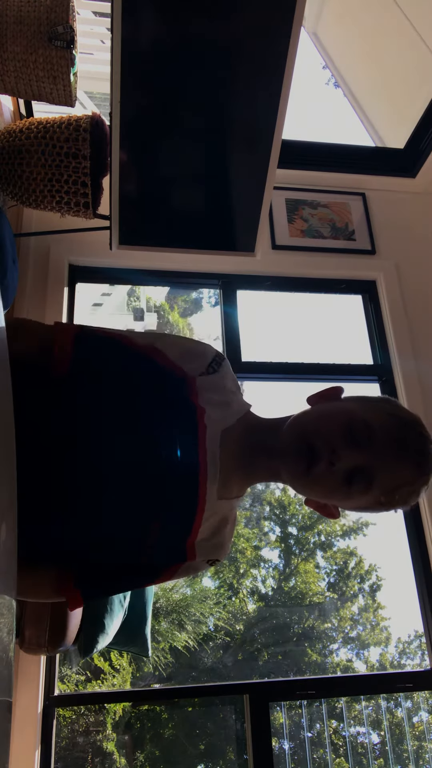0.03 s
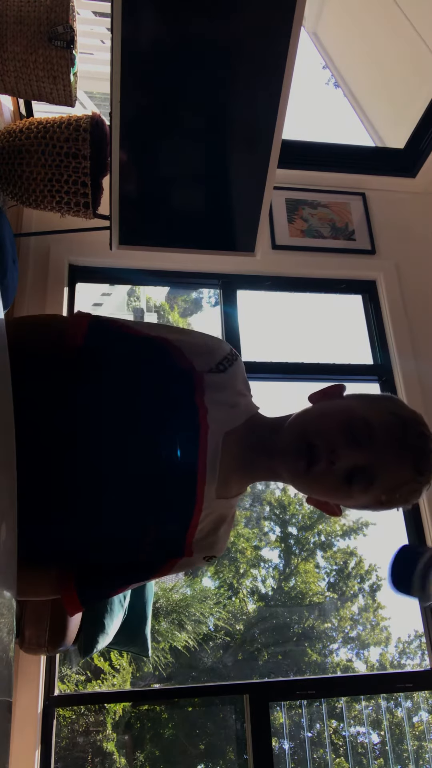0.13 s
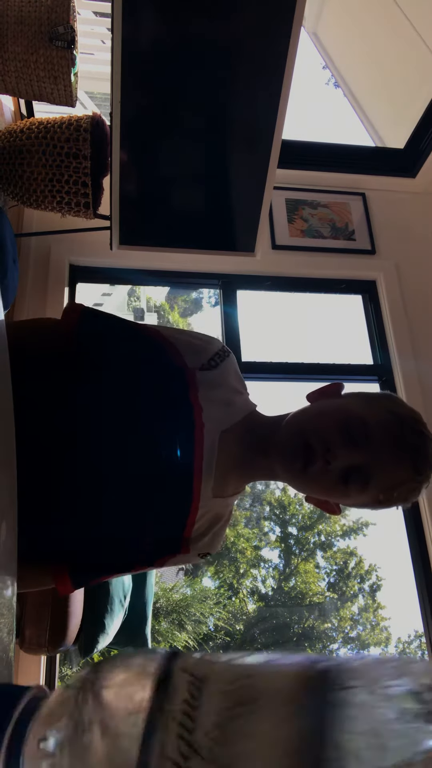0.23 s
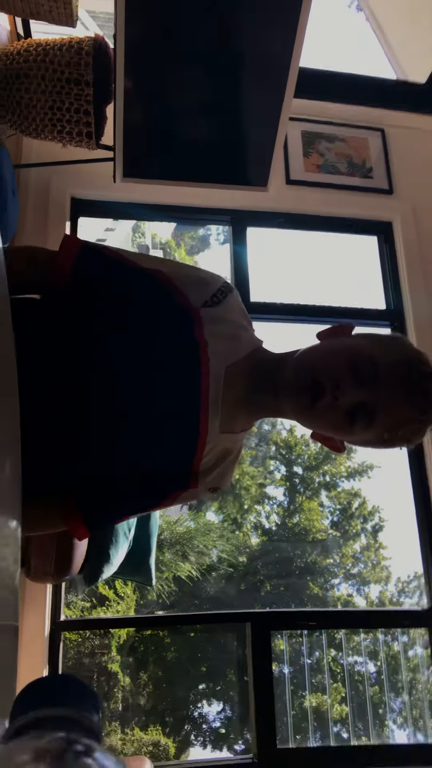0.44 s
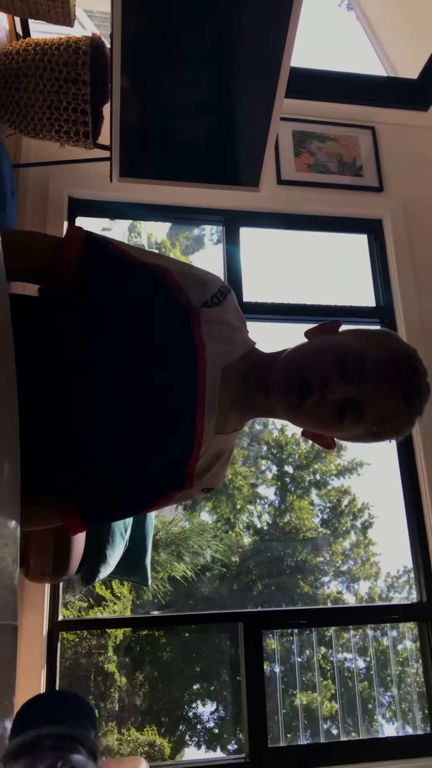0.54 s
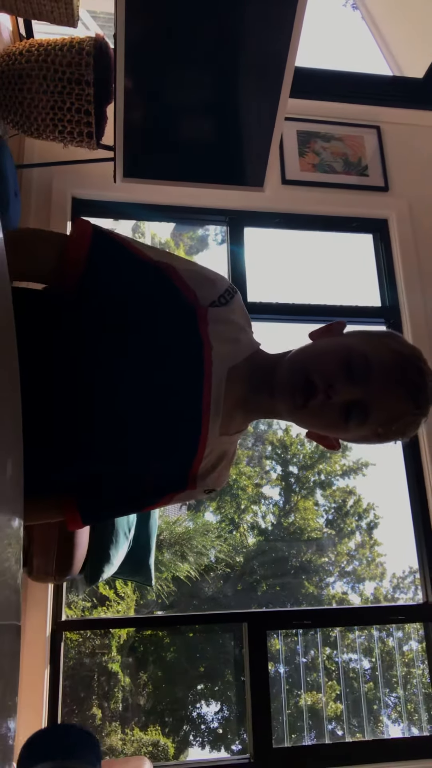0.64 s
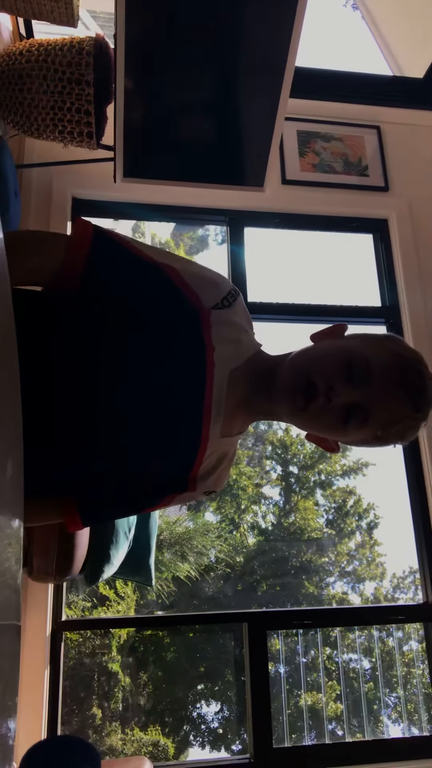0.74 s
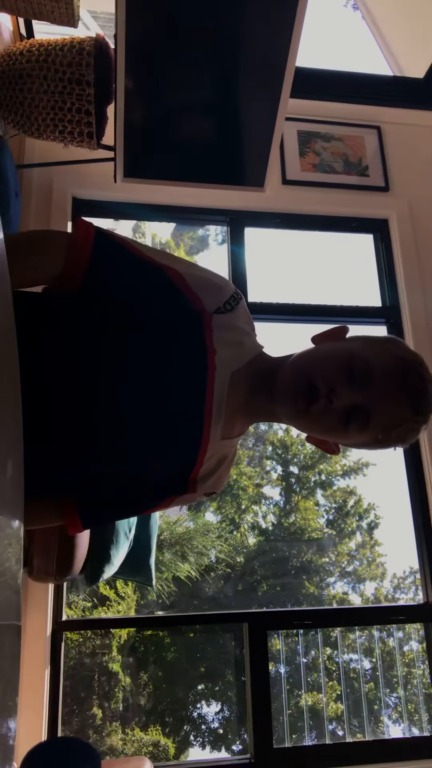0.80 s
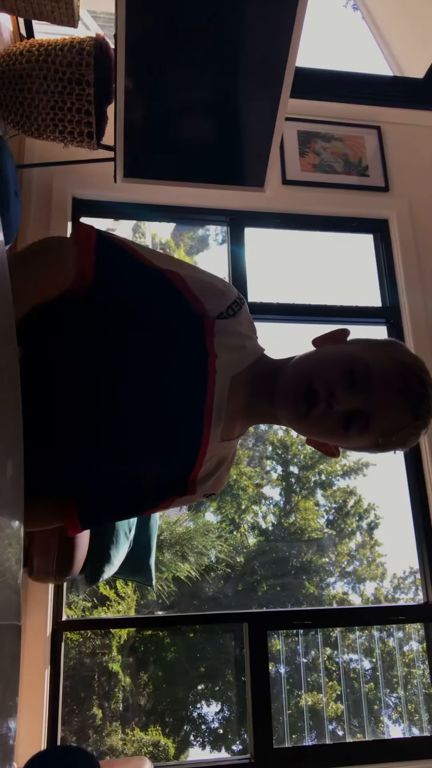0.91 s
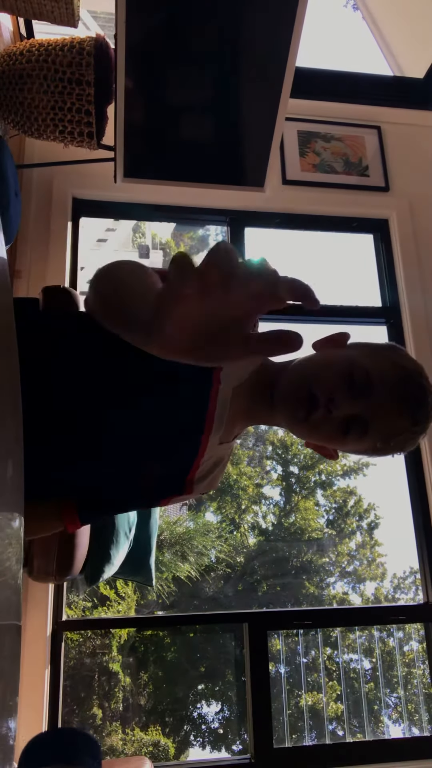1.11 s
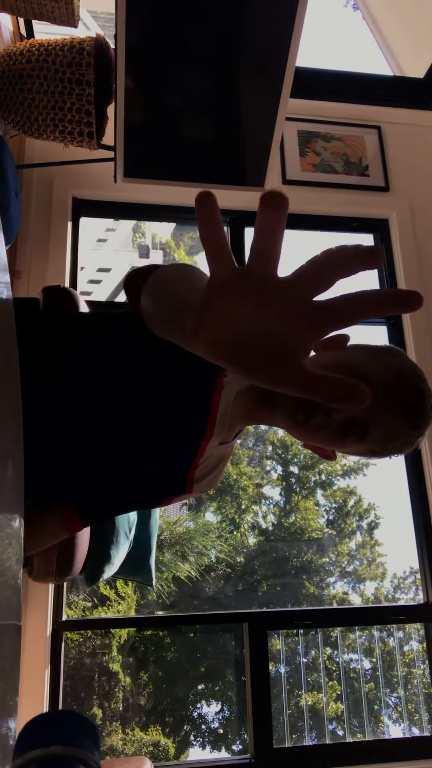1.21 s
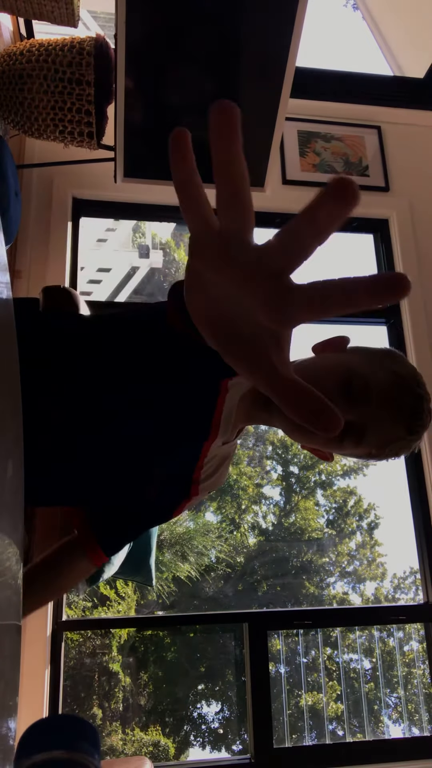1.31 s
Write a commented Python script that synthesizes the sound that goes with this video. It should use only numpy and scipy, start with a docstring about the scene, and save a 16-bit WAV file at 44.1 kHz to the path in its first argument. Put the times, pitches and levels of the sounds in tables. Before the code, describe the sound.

Close to the microphone in a living room, a plastic water bottle hits a tabletop with a sharp, hollow clack as its thin wall snaps. It rocks, knocks a second time, then comes to rest with ticks and a soft bump.

```python
"""A part-filled plastic water bottle lands on a hard table, close to the microphone in a living room.
After a light rustle it hits edge first, then flat, thudding through the table and clacking at the rim.
Its thin wall snaps and buckles, sounding a hollow rising note; it rocks, knocks down again and
settles with small ticks and a soft bump. Behind it the room rings on over a quiet rumble.
One microphone, mono, near enough that the loudest peaks are rounded."""
import sys
import numpy as np
from scipy import signal
from scipy.fft import rfft, irfft, next_fast_len
from scipy.io import wavfile
from scipy.ndimage import uniform_filter1d

SR = 44100
rng = np.random.default_rng(int(sys.argv[2]) if len(sys.argv) > 2 else 0)


def to_wav(s):
    """Save 16-bit WAV."""
    ch = np.atleast_2d(s).T  # columns
    pcm = np.round(np.clip(ch, -1, 1) * 32767)  # PCM
    wavfile.write(sys.argv[1], SR, pcm.astype(np.int16))


N = 59535

# snaps of the thin plastic: start_s, ping_db, end_pitch_hz, length_s, grit_db
WALL_SNAPS = [(0.0088, -32.5, 4880, 0.0013, -52.5), (0.0304, -27.5, 3380, 0.00091, -42),
              (0.0331, -29, 5550, 0.00055, -48), (0.1193, -35, 6180, 0.00045, -62),
              (0.229, -39, 6300, 0.00028, -57.5), (0.2493, -1, 5950, 0.00058, -14.5),
              (0.2694, -27, 6764, 0.00061, -40), (0.2738, -2, 5824, 0.0006, -30),
              (0.2903, -15, 6114, 0.00075, -39), (0.394, -41, 6160, 0.00072, -33),
              (0.4003, -31, 6050, 0.0007, -40), (0.4077, -28, 5440, 0.00073, -47),
              (0.4150, -22.5, 5720, 0.00082, -27), (0.4167, -15.5, 11450, 0.0003, -21),
              (0.5855, -34.5, 3320, 0.00067, -76), (0.5856, -36, 4720, 0.0017, -63),
              (0.669, -44.5, 6640, 0.0014, -80), (1.061, -61, 5960, 0.0022, -90)]
# blows on the table: start_s, thud_db, body_db, clack_db, edge_db, ring_db, body_t60_s
TABLE_KNOCKS = [(0.2277, -38, -38, -45, -91, -67, 0.27), (0.2493, -27.5, -8, -11.5, -32.5, -23, 0.16),
                (0.2559, -48, -17.5, -17, -28, -16.5, 0.11), (0.3836, -54, -40, -33, -42, -56, .03),
                (0.3933, -26.5, -12, -37, -30, -26.5, 0.028), (0.4157, -39, -21, -14.5, -44, -35.5, 0.052),
                (0.4188, -67, -19.5, -28.5, -30, -40.5, 0.13), (0.458, -36, -29.5, -38, -42, -65, 0.05),
                (0.51, -75, -33, -36.5, -54, -50, 0.067), (0.598, -66, -37, -44, -74, -43.5, 0.045),
                (0.9950, -69, -53, -58.5, -84, -57, 0.074), (1.0053, -52, -42, -52, -71.5, -60, 0.063),
                (1.023, -43, -44.5, -55.5, -80.5, -63, 0.095)]
# modes of bottle and tabletop: pitch_hz, level_db, t60_s
BOTTLE_MODES = [(204, -13.5, 0.2), (316, -12, .07), (564.2, -3.5, 0.27), (689, -6.5, 0.11),
                (773, -5.5, 0.1), (944, 3, .07), (1100, -16, 0.11), (1388.4, -11.5, 0.1), (1645, -7, 0.13),
                (2044, -9.5, 0.08), (2597, -8, 0.085), (3066, -12.5, 0.065), (3690, -17, 0.07)]
# buckles of the bottle's wall: start_s, level_db, t60_s
WALL_BUCKLES = [(0.2365, -20.5, 0.21), (0.2498, -1.5, 0.072), (0.273, -3, 0.075), (0.2922, -7.5, .05)]
# glide of the hollow note: time_s, pitch_hz
HOLLOW_GLIDE = [(0.243, 419.8), (0.254, 347), (0.266, 406.3), (0.278, 491), (0.297, 509), (0.311, 616)]
# dull bumps on the table: start_s, level_db, pitch_hz, t60_s
TABLE_BUMPS = [(0.25, -20, 64, 0.096), (0.277, -20, 198, .07), (0.429, -25, 495, 0.084),
               (0.448, -32, 118.3, .11), (0.482, -37, 106.2, 0.068), (0.616, -32, 110.5, 0.072),
               (1.021, -39.5, 66.65, 0.19), (1.114, -54, 355, 0.17)]
# decay of the room's echo: frequency_hz, t60_s
ROOM_DECAY = [(100, 0.99), (400, 0.69), (1200, .92), (3500, .8), (7000, 0.64), (15000, .5)]
# standing waves of the room: pitch_hz, level_db, t60_s
STANDING_WAVES = [(357.3, -71.5, 1), (386, -67.5, 1.1)]
# spectra of the noises: frequency_hz, relative_db
RUSTLE_SPECTRUM = [(50, -9), (120, 0), (200, 5), (300, -3), (500, -3.5), (1500, -6.5), (3500, -15),
                   (6000, -16), (9000, -27), (16000, -34)]  # the bottle in flight
GRIT_SPECTRUM = [(2000, -31.5), (5500, -4), (8200, -0.5), (9500, -3), (11800, -3), (14000, -4.5),
                 (16000, -11), (19000, -30)]  # bright burst in a snap
THUD_SPECTRUM = [(25, -19), (60, 2.5), (125, -7), (200, -18), (800, -79.5)]  # bass of a blow
BODY_SPECTRUM = [(100, -37), (220, -1), (370, -4.5), (600, -1), (950, -5.5), (1400, -15.5), (3000, -40),
                 (9000, -80)]  # its low mids
CLACK_SPECTRUM = [(500, -24), (1300, 1), (1650, -0.5), (2050, -3), (2500, -7.5), (4200, -10.5),
                  (6000, -19.5), (13000, -58.5)]  # the hard rim
EDGE_SPECTRUM = [(2500, -23.5), (5500, 4), (7500, 3.5), (9300, -9.5), (12000, -7), (16000, -7)]  # treble edge of a blow
ECHO_SPECTRUM = [(60, -12.5), (200, -14), (360, 0), (700, -3.5), (1000, -3), (1550, -4.5), (2000, -3.5),
                 (3000, -1.5), (4500, 0), (6500, 0.5), (9300, 6.5), (12000, 2.5), (16000, 0)]  # the room's echo
RUMBLE_SPECTRUM = [(20, -30), (45, -12.5), (66, 2), (100, -13), (150, -9.5), (250, -14.5), (380, -16),
                   (500, -20), (1000, -19), (2500, -32.5), (6000, -37), (9000, -43.5), (15000, -46.5)]  # room tone

BLOW_SAMPLES, ATTACK_S = 8192, 0.0006


def undb(db):
    return 10 ** (np.asarray(db) / 20)


def unit_rms(x):
    return x / np.sqrt(np.mean(x ** 2))


def along(points, hz):
    """Read (frequency_hz, value) points on a log-frequency axis."""
    freqs, values = np.array(points, float).T
    return np.interp(np.log(np.maximum(hz, 1)), np.log(freqs), values)


def colour(x, spectrum):
    """Filter a sound by a spectrum table."""
    size = next_fast_len(len(x), True)
    gain = undb(along(spectrum, np.fft.rfftfreq(size, 1 / SR)))
    return irfft(rfft(x, size) * gain, size)[:len(x)]


def noise(spectrum, size=N):
    return unit_rms(colour(rng.standard_normal(size), spectrum))


def dense_ring(spectrum):
    """Many close modes: coloured noise with its deepest swells evened out."""
    x = noise(spectrum, BLOW_SAMPLES)
    for _ in range(3):
        analytic = signal.hilbert(x)
        x = analytic.real / np.sqrt(np.abs(analytic) + .5)
    return unit_rms(x)


def since(start_s):
    return np.maximum(np.arange(N) / SR - start_s, 0)


def strike(t, attack_s, t60_s):
    """Quick rise, exponential fall."""
    return (1 - np.exp(-t / attack_s)) * np.exp(-np.log(1000) * t / t60_s)


def damped_note(t, hz, db, attack_s, t60_s):
    return undb(db) * np.sin(2 * np.pi * hz * t) * strike(t, attack_s, t60_s)


def add(out, start_s, x):
    """Mix a short sound in at its time."""
    part = out[max(int(start_s * SR), 0):][:len(x)]
    part += x[:len(part)]


def rustle(level_db=-43, grain_db=3, hold_s=0.02, fade_s=0.052):
    """Faint, grainy rustling that dies away after the throw."""
    grain = unit_rms(uniform_filter1d(rng.standard_normal(N), size=90))
    fade = np.exp(-since(hold_s) / fade_s)
    return undb(level_db) * unit_rms(noise(RUSTLE_SPECTRUM) * undb(grain_db * grain)) * fade


def snaps(size=512, sag=0.14):
    """A crease flips: a ping of about a millisecond that sags in pitch, with a burst of bright grit."""
    out, t = np.zeros(N), np.arange(size) / SR
    for start_s, ping_db, hz, length_s, grit_db in WALL_SNAPS:
        progress = t / length_s
        phase = 2 * np.pi * hz * length_s * (progress + sag * (1 - np.exp(-2 * progress)))
        envelope = (2 * progress * np.exp(1 - 2 * progress)) ** 2
        burst = envelope * rng.standard_normal(size)
        flat_burst = irfft(np.exp(1j * np.angle(rfft(burst))))  # equally strong at all frequencies
        grit = unit_rms(colour(flat_burst, GRIT_SPECTRUM) * np.sqrt(envelope))
        grit *= np.sqrt(np.mean(envelope ** 2))
        add(out, start_s, undb(ping_db) * envelope * np.sin(phase) + undb(grit_db) * grit)
    return out


def knocks():
    """Each blow thuds through the table and clacks at the bottle's hard rim."""
    out, t = np.zeros(N), np.arange(BLOW_SAMPLES) / SR
    for start_s, thud_db, body_db, clack_db, edge_db, _, body_t60_s in TABLE_KNOCKS:
        thud = undb(thud_db) * dense_ring(THUD_SPECTRUM) * strike(t, attack_s=0.0027, t60_s=0.092)
        body = undb(body_db) * dense_ring(BODY_SPECTRUM) * strike(t, ATTACK_S, body_t60_s)
        clack = undb(clack_db) * dense_ring(CLACK_SPECTRUM) * strike(t, ATTACK_S, t60_s=0.056)
        edge = undb(edge_db) * noise(EDGE_SPECTRUM, len(t)) * strike(t, ATTACK_S / 2, t60_s=0.022)
        add(out, start_s, thud + body + clack + edge)
    return out


def bottle_ring():
    """Every blow rings the same short-lived modes of bottle and tabletop."""
    out, t = np.zeros(N), np.arange(BLOW_SAMPLES) / SR
    ring = sum((-1) ** k * damped_note(t, hz, db, ATTACK_S, t60_s)
               for k, (hz, db, t60_s) in enumerate(BOTTLE_MODES))
    for start_s, *_, ring_db, _ in TABLE_KNOCKS:
        add(out, start_s, undb(ring_db) * ring)
    return out


def hollow_note(attack_s=0.0011, end_s=0.305, release_s=0.0043):
    """One hollow note, renewed at each buckle, dips, rises as the dented wall springs back, then stops."""
    hz = np.interp(since(0), *np.array(HOLLOW_GLIDE).T)
    swell, t = np.zeros(N), np.arange(BLOW_SAMPLES) / SR
    for start_s, db, t60_s in WALL_BUCKLES:
        add(swell, start_s, undb(db) * strike(t, attack_s, t60_s))
    release = np.exp(-since(end_s) / release_s)
    phase = 2 * np.pi * np.cumsum(hz * (swell > 0)) / SR  # runs from the first buckle
    return swell * release * np.sin(phase)


def bumps(attack_s=0.004):
    """Soft pushes on the table, each sounding one low, damped note."""
    out, t = np.zeros(N), np.arange(BLOW_SAMPLES) / SR
    for start_s, db, hz, t60_s in TABLE_BUMPS:
        add(out, start_s, damped_note(t, hz, db, attack_s, t60_s))
    return out


def thump(start_s=0.3935, level_db=-17.5, start_hz=517, end_hz=74, fall_s=0.0045):
    """The tabletop flexes as the bottle rocks back; the highs arrive first, so the pitch drops."""
    t = since(start_s)
    cycles = end_hz * t + (start_hz - end_hz) * fall_s * (1 - np.exp(-t / fall_s))
    return undb(level_db) * np.sin(2 * np.pi * cycles) * strike(t, ATTACK_S, t60_s=0.043)


def room_echo(x, tail_db=-11, build_s=0.003, bands=7, size=40960):
    """Diffuse echo off bare walls and windows; the treble dies first and two standing waves linger."""
    t, freqs = np.arange(size) / SR, np.fft.rfftfreq(size, 1 / SR)
    centres_hz = np.geomspace(150, 15000, bands)
    white, tail = rfft(rng.standard_normal(size)), 0
    for hz, weights in zip(centres_hz, np.eye(bands)):
        band = irfft(white * along(list(zip(centres_hz, weights)), freqs), size)
        tail = tail + band * strike(t, build_s, along(ROOM_DECAY, hz))
    tail = undb(tail_db) * colour(tail / np.sqrt(np.sum(tail ** 2)), ECHO_SPECTRUM)
    waves = sum(damped_note(t, hz, db, build_s, t60_s) for hz, db, t60_s in STANDING_WAVES)
    return signal.fftconvolve(x, tail + waves)[:N]


def scene(rumble_db=-58):
    """The bottle up close, with the room's echo and low rumble behind it."""
    landing = knocks() + thump() + bumps() + rustle()
    ring, note, creases = bottle_ring(), hollow_note(), snaps()
    # only a share of the ring, note and snaps reaches the room
    echo = room_echo(landing + undb(-9) * ring + undb(-10.5) * note + undb(-8) * creases)
    rumble = undb(rumble_db) * noise(RUMBLE_SPECTRUM)
    return (landing + ring + note + creases + echo + rumble)[None]


def record(dry):
    """The microphone sheds the deepest bass, rounds the loudest peaks and cuts the top."""
    low_cut_hz, top_hz, ceiling = 31, 15950, 0.93
    lean = signal.sosfilt(signal.butter(2, low_cut_hz, "high", fs=SR, output="sos"), dry)
    rounded = lean / (1 + np.abs(lean / ceiling) ** 6) ** (1 / 6)
    return signal.sosfilt(signal.ellip(10, .2, 80, top_hz, fs=SR, output="sos"), rounded)


dry = scene()
out = record(dry)
to_wav(out)
```